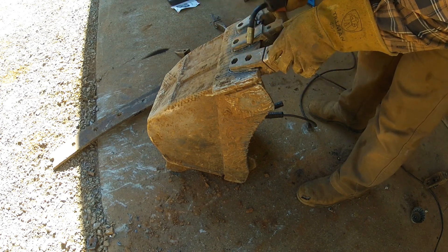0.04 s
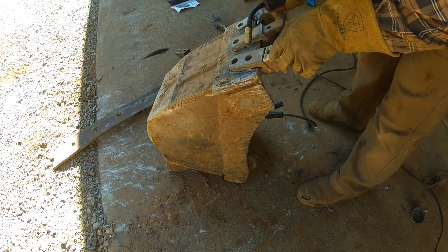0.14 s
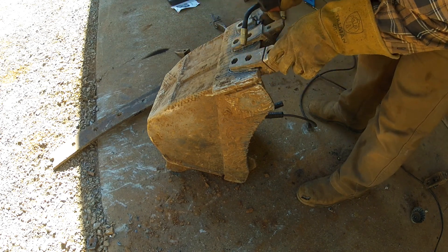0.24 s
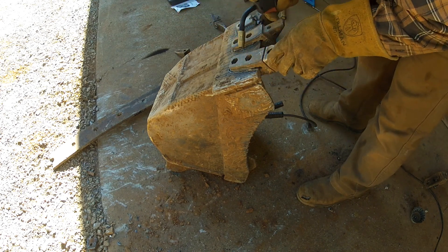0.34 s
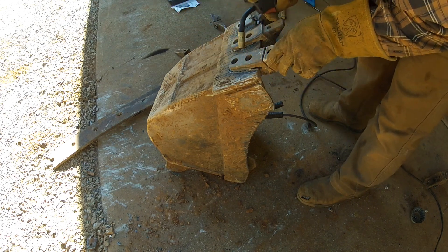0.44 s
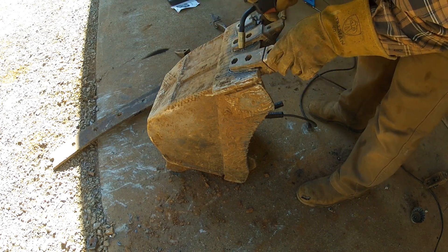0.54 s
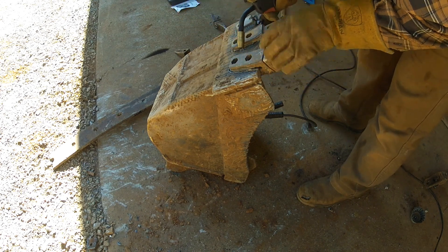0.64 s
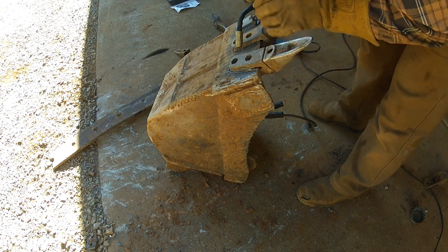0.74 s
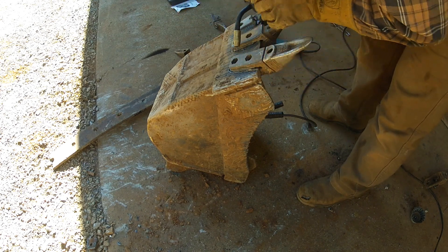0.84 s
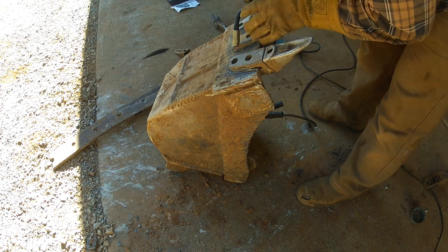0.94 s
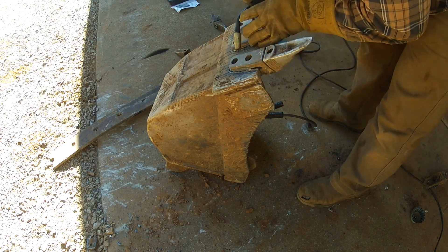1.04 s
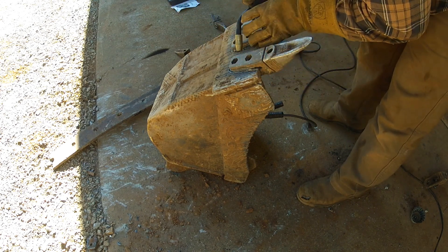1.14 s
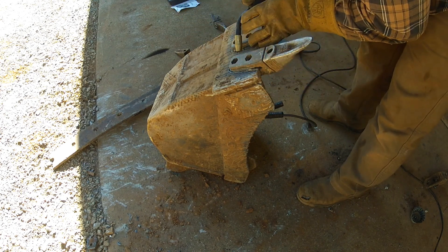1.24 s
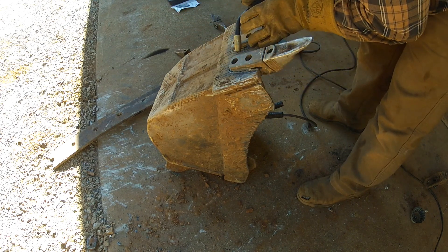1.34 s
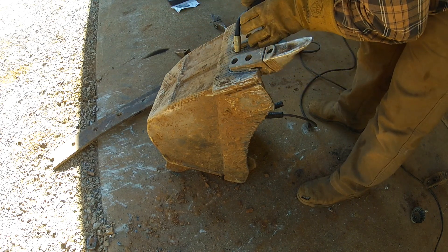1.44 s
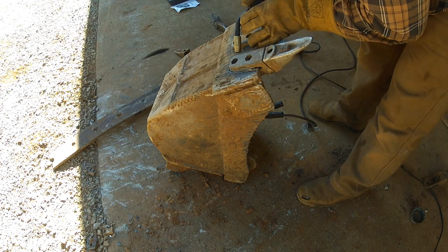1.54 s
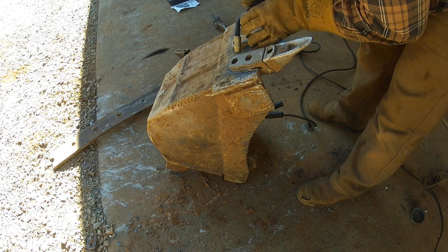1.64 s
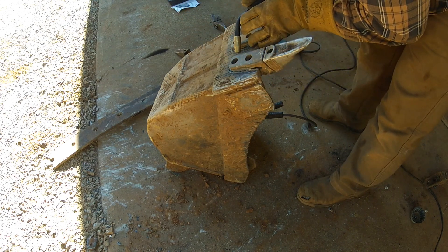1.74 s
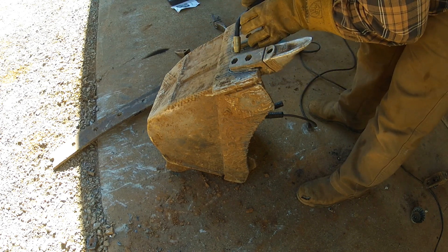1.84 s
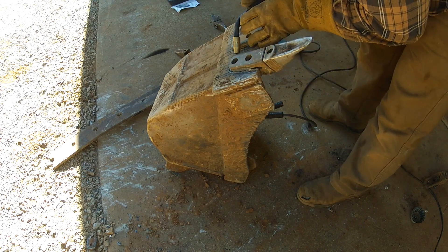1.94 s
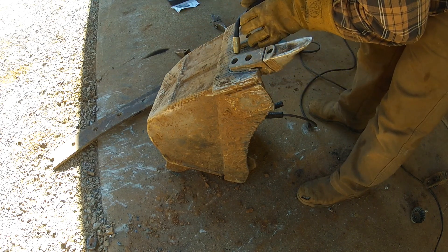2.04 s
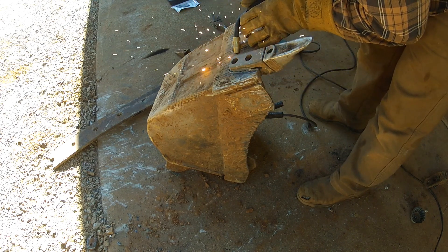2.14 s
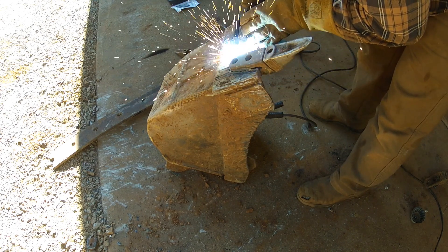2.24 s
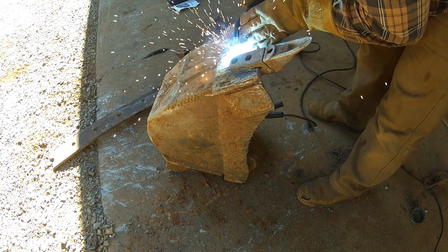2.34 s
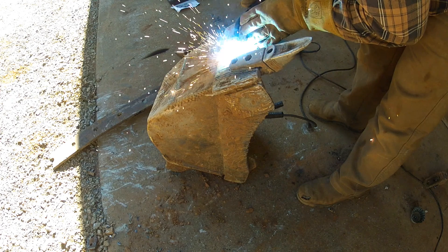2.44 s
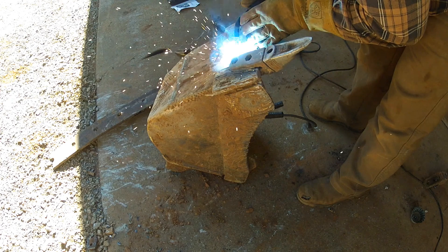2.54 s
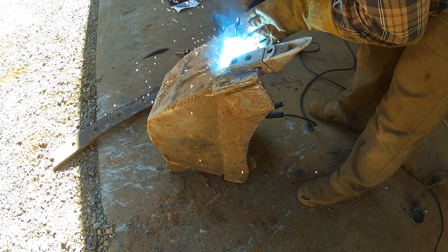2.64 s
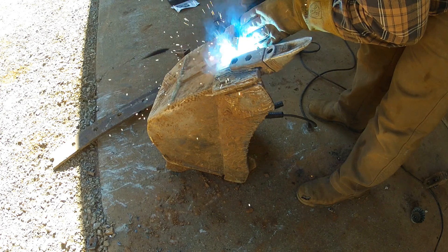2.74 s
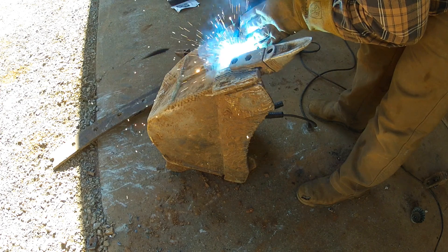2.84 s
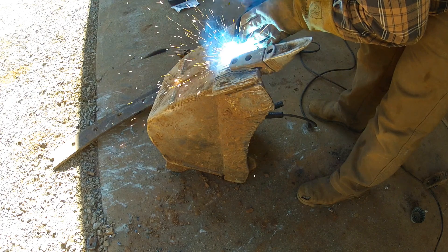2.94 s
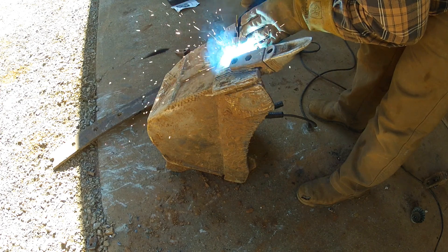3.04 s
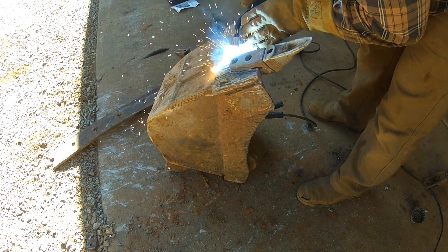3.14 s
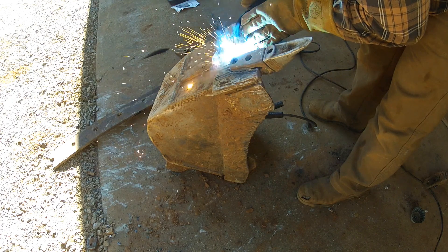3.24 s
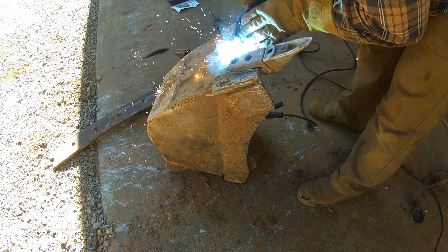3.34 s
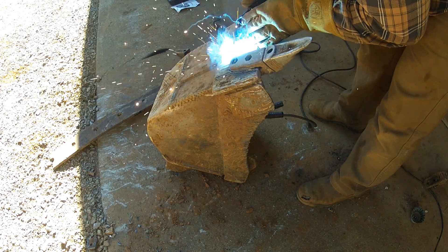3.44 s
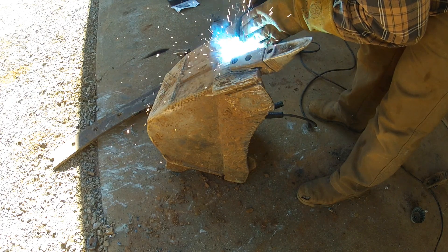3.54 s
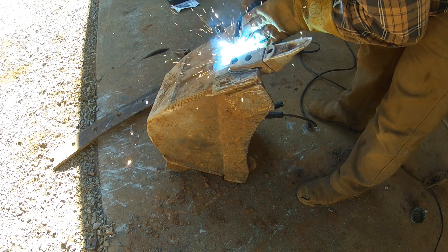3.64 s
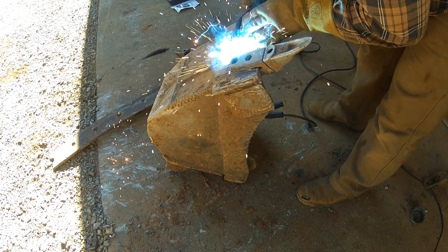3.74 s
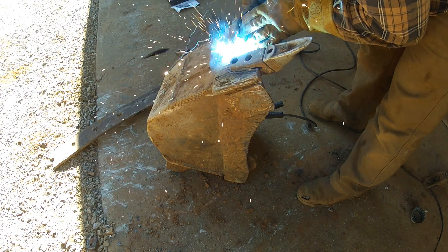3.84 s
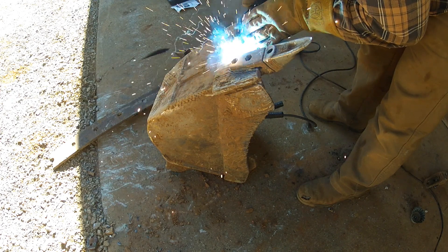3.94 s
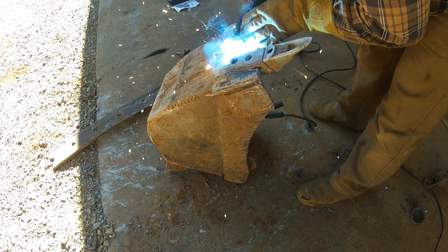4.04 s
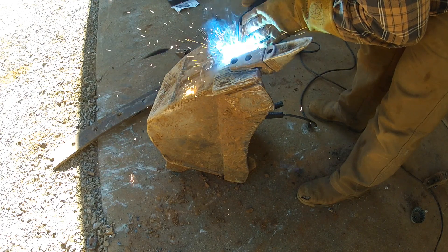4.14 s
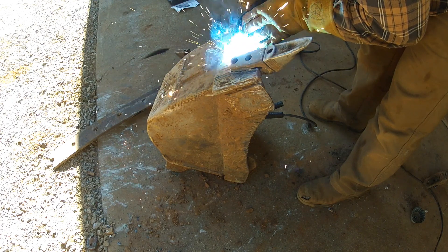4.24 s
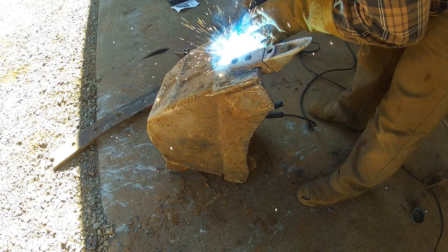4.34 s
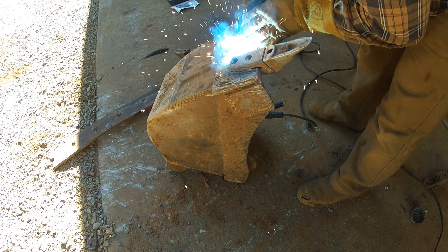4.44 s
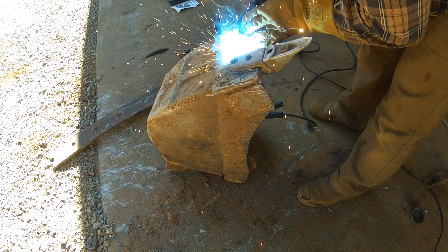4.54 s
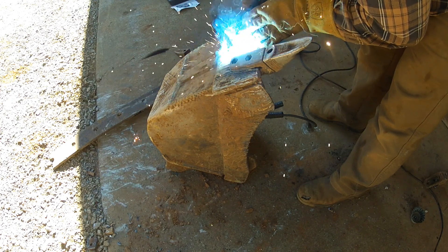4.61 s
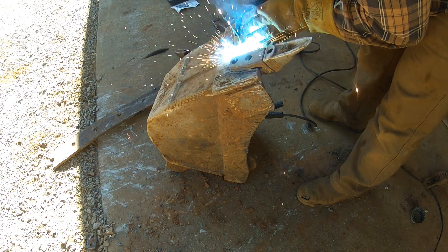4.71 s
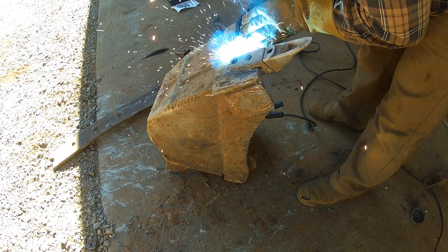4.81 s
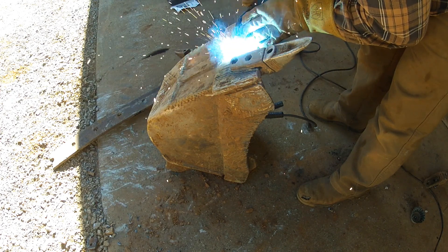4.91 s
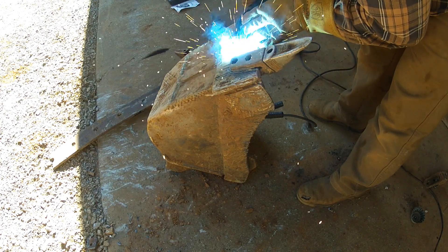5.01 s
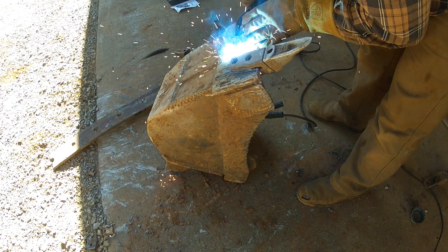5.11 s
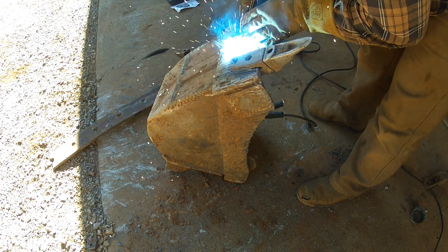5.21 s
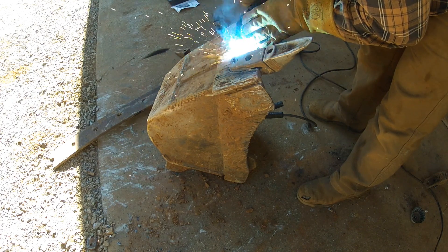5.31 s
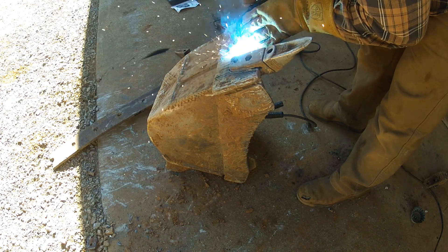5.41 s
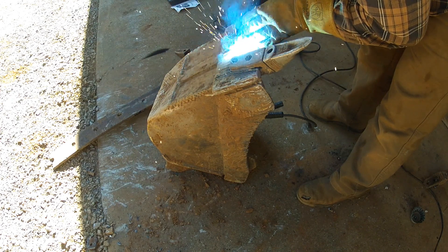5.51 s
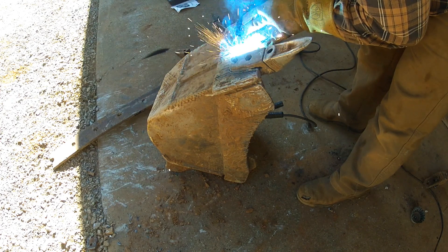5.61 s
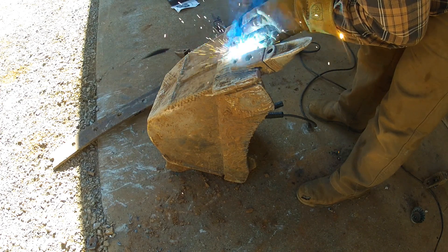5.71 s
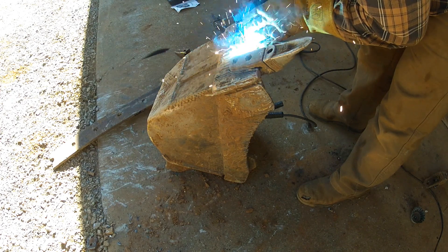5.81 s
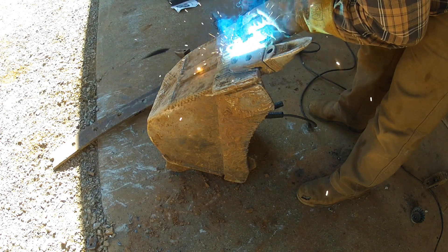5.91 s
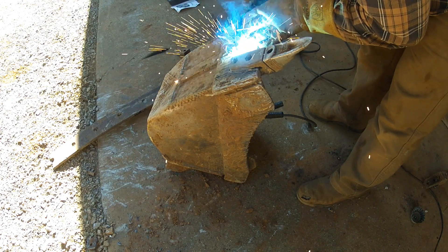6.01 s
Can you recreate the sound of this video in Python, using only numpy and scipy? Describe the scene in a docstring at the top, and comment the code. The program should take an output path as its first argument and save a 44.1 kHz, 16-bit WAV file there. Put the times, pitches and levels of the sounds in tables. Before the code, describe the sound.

Low road noise and a truck engine climbing in pitch come from outside, with thin hiss and wavering hum. Just after two seconds a single snap is followed by continuous arc welding, close and very loud: hard, dry pops at some fifty to eighty per second, irregular in strength, over a gritty sizzle. A short shed reverberation surrounds them. The truck changes gear, barely audible underneath.

```python
"""A wire welder works on a steel digger bucket in an open shed: each short circuit of the wire breaks with a sharp pop,
answered by the steel, the concrete floor and the walls, over the sizzle of the arc.
Far off a truck speeds up and changes gear above a low traffic rumble."""
import sys
import numpy as np
from scipy import signal
from scipy.fft import rfft, irfft, next_fast_len
from scipy.io import wavfile
from scipy.ndimage import map_coordinates

SR = 44100
rng = np.random.default_rng(int(sys.argv[2]) if len(sys.argv) > 2 else 0)


def to_wav(s):
    """Save 16-bit WAV."""
    ch = np.atleast_2d(s).T  # columns
    pcm = np.round(np.clip(ch, -1, 1) * 32767)  # PCM
    wavfile.write(sys.argv[1], SR, pcm.astype(np.int16))


N = 267687

# arc re-ignitions: (s, pressure pulse peak dB)
POPS = [(2.1237, 0.4), (2.2072, -0.7), (2.2149, -2.1), (2.2284, -6.4), (2.2374, -6.0), (2.2472, -5.7),
        (2.2716, -0.9), (2.2863, -1.7), (2.2977, 0.3), (2.3071, -5.2), (2.3159, -8.3), (2.3295, 0.2),
        (2.3441, -4.4), (2.3586, -4.2), (2.3654, -5.0), (2.3792, -2.6), (2.403, -1.9), (2.4232, -3.2),
        (2.4376, -2.6), (2.4516, -5.8), (2.4592, -2.6), (2.4741, -1.8), (2.4818, -3.4), (2.4982, -0.4),
        (2.5128, -2.4), (2.5344, 0.5), (2.5473, -11.8), (2.557, -2.9), (2.5649, -2.0), (2.5764, -8.0),
        (2.5847, -4.3), (2.599, -1.1), (2.6086, -9.4), (2.623, -1.5), (2.6318, -3.5), (2.6552, -1.9),
        (2.6647, -3.9), (2.6868, -1.2), (2.7005, -7.6), (2.7188, -0.9), (2.7422, -0.8), (2.7552, -10.8),
        (2.7706, 0.6), (2.7836, -12.0), (2.7958, -2.4), (2.8111, -6.0), (2.8223, -2.3), (2.8467, -2.2),
        (2.8592, -7.8), (2.8804, 0.9), (2.8916, -3.4), (2.9036, -1.8), (2.9156, -5.9), (2.9274, -3.1),
        (2.9414, -1.1), (2.9651, -3.2), (2.9792, -3.5), (2.9912, -2.5), (3.0023, -2.4), (3.0244, -2.2),
        (3.0401, -10.2), (3.0483, -3.4), (3.0615, -5.3), (3.0746, -3.3), (3.0878, -3.0), (3.0997, -1.8),
        (3.1127, -3.2), (3.1519, -2.0), (3.165, -3.7), (3.1757, -5.7), (3.1885, -8.0), (3.2025, -1.7),
        (3.2144, -3.5), (3.2322, -1.5), (3.2444, -7.7), (3.26, -1.4), (3.2678, -11.2), (3.2831, -2.2),
        (3.2992, -2.8), (3.3136, -3.1), (3.3267, -2.6), (3.3456, -7.8), (3.3563, -1.8), (3.3724, -1.1),
        (3.3853, -8.4), (3.3966, -3.7), (3.4145, -3.9), (3.426, -1.3), (3.4393, -3.8), (3.4545, -8.0),
        (3.467, -3.0), (3.4875, -6.6), (3.4975, -2.2), (3.5142, -1.6), (3.5347, -6.2), (3.5466, -2.0),
        (3.5644, -1.2), (3.5774, -11.6), (3.5851, -4.9), (3.5983, -5.1), (3.6126, -6.5), (3.6285, -5.2),
        (3.6425, -7.6), (3.6586, -10.5), (3.6713, -3.1), (3.689, -1.9), (3.708, -3.2), (3.7222, -8.0),
        (3.7486, -5.9), (3.7646, -4.2), (3.7857, -3.8), (3.8077, -2.9), (3.8399, -2.0), (3.8613, -5.0),
        (3.8818, -2.1), (3.8993, -2.5), (3.9174, -2.4), (3.945, -5.7), (3.9655, -5.5), (3.982, -7.1),
        (3.9985, -6.2), (4.0195, -4.2), (4.0394, -2.1), (4.0581, -1.9), (4.0781, -3.5), (4.0995, -1.6),
        (4.1243, -3.3), (4.1331, -2.1), (4.1548, -2.2), (4.1637, -5.1), (4.1836, -4.4), (4.1926, -1.5),
        (4.2132, -3.1), (4.2233, -3.8), (4.2346, -9.7), (4.2462, -0.7), (4.2586, -2.1), (4.2872, -5.9),
        (4.2984, -2.1), (4.3094, -9.5), (4.3255, -8.2), (4.3332, -0.8), (4.3571, -2.7), (4.3667, -0.8),
        (4.3807, -6.0), (4.3918, -4.1), (4.4223, -3.4), (4.4343, -7.1), (4.4462, -1.6), (4.4593, -0.1),
        (4.4709, -6.6), (4.4831, -5.2), (4.5054, -1.7), (4.5341, -2.7), (4.5572, -3.4), (4.5689, -2.8),
        (4.5897, -4.1), (4.5989, -5.2), (4.6237, -3.5), (4.634, -2.2), (4.6556, -6.7), (4.6825, -5.3),
        (4.7044, -5.0), (4.7146, -7.5), (4.7372, -3.8), (4.7567, -2.8), (4.7771, -7.2), (4.7997, -2.0),
        (4.8208, -3.9), (4.8417, -4.0), (4.8617, -1.7), (4.8832, -4.1), (4.9035, -7.6), (4.924, -5.8),
        (4.9439, -5.3), (4.9636, -2.2), (4.987, -9.9), (5.0186, -4.6), (5.0443, -5.1), (5.0538, -11.1),
        (5.0643, -1.8), (5.0844, -2.8), (5.1068, -3.4), (5.1257, -2.8), (5.1468, -5.1), (5.1677, -3.4),
        (5.189, -2.3), (5.2118, -3.9), (5.232, -1.3), (5.254, -3.2), (5.2773, -3.5), (5.2902, -0.2), (5.3063, -2.5),
        (5.3184, -6.8), (5.3404, -3.2), (5.3661, -3.0), (5.3832, -5.5), (5.405, -5.6), (5.4173, -10.0),
        (5.4446, -7.8), (5.4642, -8.2), (5.4919, -4.4), (5.5097, -9.2), (5.523, -2.5), (5.55, -1.2), (5.5584, -5.5),
        (5.5826, -4.2), (5.5969, -7.2), (5.6112, -11.1), (5.6273, -1.2), (5.641, -8.6), (5.6615, 0.9),
        (5.6763, -9.4), (5.6945, -11.0), (5.7078, 0.3), (5.7208, -12.4), (5.7361, -7.8), (5.7571, -3.9),
        (5.77, -7.5), (5.7816, -1.4), (5.8068, -4.7), (5.8186, -6.6), (5.8319, -6.3), (5.8479, -9.5),
        (5.8738, -5.3), (5.8858, -4.5), (5.8993, -0.3), (5.9185, -5.5), (5.9372, -8.0), (5.9504, -1.2),
        (5.975, -5.3), (5.9889, -6.9), (6.0087, -1.7), (6.0239, -2.3), (6.0525, 0.1)]  # fixed
# colour of the pressure pulse: (Hz, dB per Hz)
PULSE = [(35, -32.5), (60, -22), (135, -13), (200, -4), (284, 1.5), (370, -3), (486, -3), (618, -1), (800, -11), (1080, -13.5),
         (1740, -9), (2570, -6), (4310, -19.5), (6500, -47.5)]
# colour of the crack and sizzle treble: (Hz, dB per Hz)
CRACK = [(2060, -19.5), (3500, -8), (3910, -4), (4250, -13), (4800, -1), (5600, -4), (6030, -10.5), (6500, -2.5), (7720, -3.5),
         (9380, 0), (12000, -33), (14800, -0.5), (15800, -22), (16500, -48)]
# near surfaces: (delay s, signed share of the direct pop)
ECHOES = [(.000235, -0.17), (.00155, 0.12), (.00188, 0.13), (.00263, 0.037), (.00311, 0.26), (.00442, 0.11), (.00456, -0.092), (.0051, 0.099),
          (0.0132, 0.056), (0.0212, -0.075)]
SHED = [(150, 0.096), (400, 0.29), (1000, 0.23), (2800, 0.17), (7000, 0.15), (15000, 0.12)]  # (Hz, t60 s)
WALLS = [(100, 3.5), (400, -10.5), (1000, -6), (3000, 5.5), (7000, 10.5), (11000, 1.5), (16000, 0)]  # what the walls return: (Hz, dB)
SIZZLE = [(2.2, -32), (2.33, -21.5), (3.0, -31), (3.4, -25.5), (4.2, -29.5), (4.6, -32.5), (6.07, -28)]  # burning arc: (s, dB)
# truck engine in two gears: (s, firing Hz, load dB)
TRUCK = [[(0.0, 44, -3), (0.87, 50.9, -2), (1.5, 54.3, 0), (2.0, 63.1, 1), (2.5, 65.7, 0), (3.0, 68.6, 1), (3.55, 68.8, 5.5), (3.95, 71.5, 1.5)],
         [(4.4, 46.5, -8), (4.8, 48.35, -3.5), (5.2, 46, -3.5), (5.6, 45.24, -8.5), (6.07, 41.15, -8)]]
RUMBLE = [(15, -9), (25, -15), (64, -4.5), (129, -3), (224, -2), (350, -6.5), (422, -3.5), (468, -5.5), (637, -8.5),
          (838, -22.5), (913, -28), (977, -62), (1500, -28), (1950, -72), (3300, -120)]  # traffic: (Hz, dB per Hz)
HISS = [(600, -30), (850, -11.5), (1100, -2.5), (1720, -8.5), (3000, -9), (5200, -21), (5990, -32), (6800, -22), (9110, -19),
        (10800, -23), (12000, -17), (13200, -29), (14900, -24), (15200, -62)]  # air and microphone hiss: (Hz, dB per Hz)
TRAFFIC = [(0, -44.5), (.6, -45), (1.301, -44.5), (1.999, -42.5), (4, -41.5), (6.07, -53.5)]  # (s, dB)
TOP_HZ = 15900  # fixed
TIME = np.arange(N) / SR
# a machine idling nearby: (Hz, dB, waver dB)
HUM = [(213.6, -54, 4), (427, -60, 5), (641, -65, 4), (907.5, -72, 1)]  # fixed
HOUSING = [(11620, 160, 8.5), (12670, 270, 8)]  # camera housing resonances: (Hz, width Hz, lift dB)
ARC_ON_S = 2.207  # the arc holds from here; fixed
FAINT_PER_S, FAINT_DB, FAINT_SPREAD_DB = 5, -14, 0.5  # faint re-ignitions at random moments
CRACK_DB, CRACK_FOLLOWS, CRACK_SPREAD_DB = 1.34, 0.96, 1.43  # the crack grows less than the pulse (dB per dB)
# what the exhaust pipe passes of each order: (Hz, dB rms)
EXHAUST = [(44, -55), (58, -42.5), (71, -55), (89, -42.5), (105, -50), (114, -45), (130, -49.5), (140, -40.5), (165, -58.5), (210, -51)]
THUMP_DB, THUMP_SPREAD_DB, THUMP_WEAK = 0., 1., 0.12  # the part below 900 Hz against the pulse, its scatter, its gain as pops weaken (dB per dB)


def amp(db):
    """dB to gain."""
    return 10 ** (np.asarray(db) / 20)


def unit(x):
    """Scale to rms 1."""
    return x / np.sqrt(np.mean(x ** 2) + 1e-20)


def along(points, hz):
    """(Hz, value) points on a log axis."""
    f, v = np.transpose(points)
    return np.interp(np.log(hz + 1), np.log(f + 1), v)


def causal(spectrum, size=4096):
    """Minimum-phase impulse response of a (Hz, dB) spectrum, energy 1."""
    db = np.maximum(along(spectrum, np.fft.rfftfreq(size, 1 / SR)), -90)  # fixed
    cepstrum = irfft(np.log(amp(db)))
    cepstrum[1:size // 2] *= 2
    cepstrum[size // 2 + 1:] = 0
    response = irfft(np.exp(rfft(cepstrum)))[:size // 2]
    return response / np.linalg.norm(response)


def through(x, response):
    """x convolved with an impulse response."""
    return signal.fftconvolve(x, response)[:N]


def wobble(rate):
    """A smooth random curve, rate knots a second."""
    return map_coordinates(rng.standard_normal(int(N * rate / SR) + 4), [TIME * rate])


def noise(spectrum):
    """Coloured noise of rms 1."""
    return unit(through(rng.standard_normal(N), causal(spectrum)))


def train(s, size):
    """Impulses at times s."""
    return np.bincount(np.round(np.asarray(s) * SR).astype(int), size, N)[:N]


def pops():
    """Each break of the short circuit gives a pressure pulse, much alike each time, and a crack of spitting metal."""
    when, size = rng.random((int(FAINT_PER_S * (N / SR - ARC_ON_S)), 2)).T
    s, db = np.transpose(POPS)
    s = np.append(s, ARC_ON_S + when * (N / SR - ARC_ON_S))
    db = np.append(db, FAINT_DB + FAINT_SPREAD_DB * 2 * (2 * size - 1))
    scatter = rng.standard_normal((len(s), 2))
    thump_db = THUMP_DB - THUMP_WEAK * db + THUMP_SPREAD_DB * scatter[:, 0]
    crack_db = CRACK_DB + CRACK_FOLLOWS * db + CRACK_SPREAD_DB * scatter[:, 1]
    shape = causal(PULSE)
    shape = -shape / np.abs(shape).max()
    push, where = bursts(s, t60=0.0016, ragged=0.081)
    pulse = through(np.bincount(where.ravel(), (push * amp(db)[:, None]).ravel(), N), shape)
    low = signal.lfilter(*signal.butter(1, 900, fs=SR), shape)  # fixed
    pulse += through(train(s, amp(db) * (amp(thump_db) - 1)), low)
    spit, where = bursts(s, t60=0.011, ragged=0.14)
    spit = signal.fftconvolve(spit, causal(CRACK)[None, :spit.shape[1]], axes=1)[:, :spit.shape[1]]
    spit *= amp(crack_db)[:, None] / np.linalg.norm(spit, axis=1, keepdims=True)
    return pulse + np.bincount(where.ravel(), spit.ravel(), N)[:N]


def sizzle():
    """The arc column hisses in uneven spurts between the pops."""
    s, db = np.transpose(SIZZLE)
    level = amp(np.interp(TIME, s, db, left=-120) + 5.53 * wobble(60) + 3.8 * wobble(300))
    return level * (0.29 * noise(PULSE) + 0.18 * noise(CRACK))


def shed(x, count=8):
    """Near echoes and the diffuse tail, which changes in part as the torch and the welder move."""
    delay, share = np.transpose(ECHOES)
    near = through(x, train(delay, share)[:SR // 20])
    stage = (TIME * 4).astype(int) % count  # fixed
    lasting = 0.9 * through(x, tail())
    shifting = 0.54 * sum(through(x * (stage == k), tail()) for k in range(count))
    return 0.97 * x + near + amp(-8.5) * (lasting + shifting)


def truck(count=3):
    """Low engine orders through the exhaust, slightly unsteady, fading at the gear change."""
    out = np.zeros(N)
    for gear in TRUCK:
        s, hz, load_db = np.transpose(gear)
        firing = np.interp(TIME, s, hz)
        phase = 2 * np.pi * np.cumsum(firing * (1 + 0.0068 * wobble(10))) / SR
        fade = np.clip((TIME - s[0] + 0.054) / .05, 0, 1) * np.clip((s[-1] + 0.072 - TIME) / 0.054, 0, 1)
        for k in range(1, count + 1):
            db = np.interp(TIME, s, load_db) + along(EXHAUST, k * firing) + 1.66 * wobble(7.9)
            out += np.sqrt(2) * fade * amp(db) * np.sin(k * phase)
    return out


def background():
    """Traffic rumble that swells slowly, wavering hum lines and a steady hiss."""
    s, db = np.transpose(TRAFFIC)
    hum = sum(np.sqrt(2) * amp(level + waver_db * wobble(9)) * np.sin(2 * np.pi * hz * TIME + 0.4 * waver_db * wobble(7))
              for hz, level, waver_db in HUM)
    return amp(np.interp(TIME, s, db) + 0.58 * wobble(2.76)) * noise(RUMBLE) + hum + amp(-61) * noise(HISS)


def bursts(s, t60, ragged):
    """One row per event: a sharp front followed by thin random after-sparks, with the sample index of each value."""
    life = np.arange(320)  # fixed
    sparks = rng.standard_normal((len(s), len(life))) * amp(-60 * life / SR / t60)
    rows = ragged * (sparks - np.pad(sparks, ((0, 0), (6, 0)))[:, :len(life)])  # each spark pushes and pulls back; fixed
    rows[:, 0] = 1
    return rows, np.round(s * SR).astype(int)[:, None] + life


def tail():
    """A diffuse decay that swells once the far walls answer and dies band by band."""
    hz, t, z = signal.stft(rng.standard_normal(SR // 2), SR, nperseg=256)
    decay = signal.istft(z * amp(along(WALLS, hz)[:, None] - 60 * t / along(SHED, hz)[:, None]), SR, nperseg=256)[1]
    t = TIME[:len(decay)]
    decay = decay * (0.29 + 0.66 / (1 + np.exp(-(t - .0115) / 0.00021))) * (t > .0015)
    return decay / np.linalg.norm(decay)


def scene():
    """The arc in the shed, the road outside."""
    return (shed(pops()) + sizzle() + truck() + background())[None]


def record(dry):
    """The housing lifts two narrow treble bands, loud peaks saturate softly, nothing passes above the band limit."""
    m = next_fast_len(N + SR // 2)
    f = np.fft.rfftfreq(m, 1 / SR)
    lift = 1 + sum(amp(db) * 1j * f * w / (c * c - f * f + 1j * f * w) for c, w, db in HOUSING)
    x = irfft(rfft(dry, m) * lift, m)
    x = x / (1 + np.abs(x / .95) ** 4) ** (1 / 4)  # fixed
    return irfft(rfft(x) * (f < TOP_HZ), m)[..., :N]


dry = scene()
out = record(dry)
to_wav(out)
```